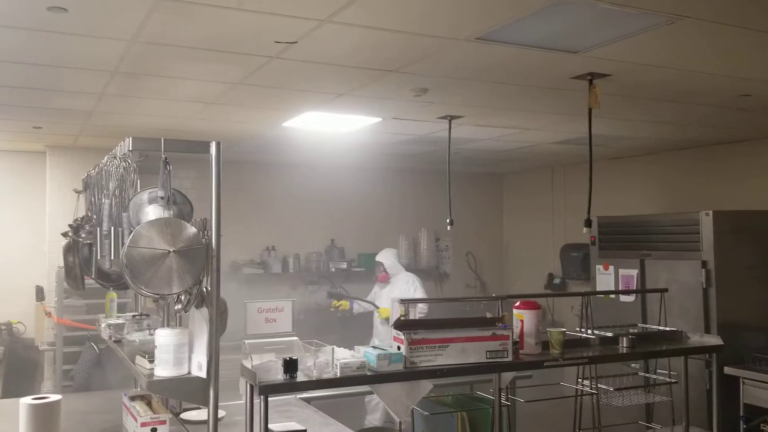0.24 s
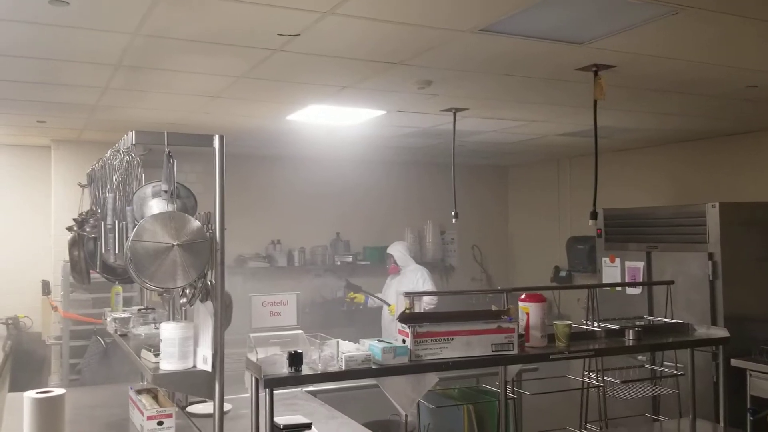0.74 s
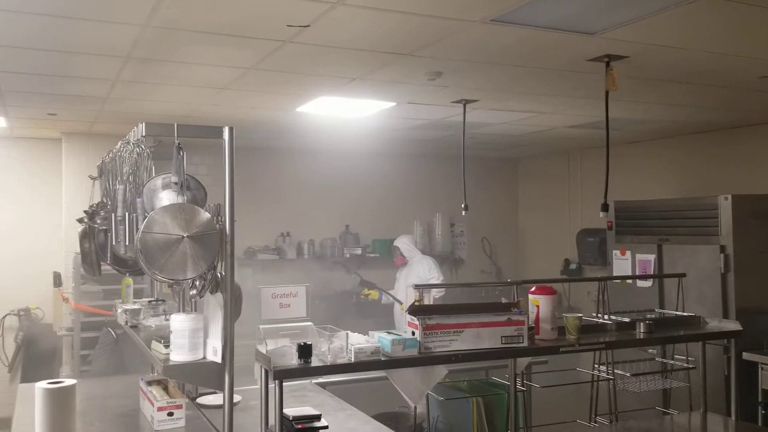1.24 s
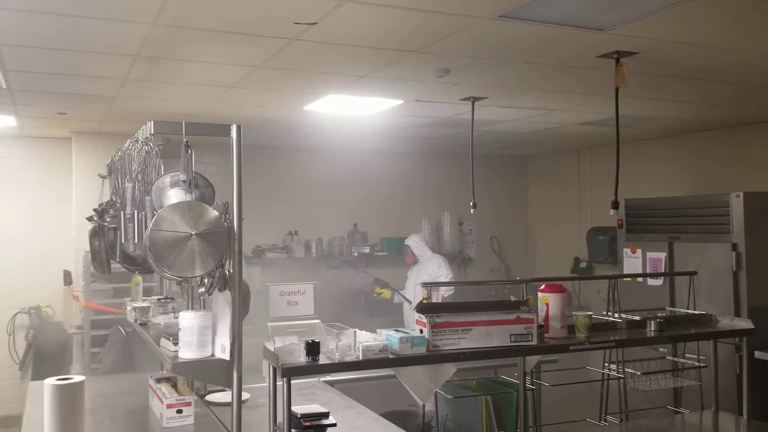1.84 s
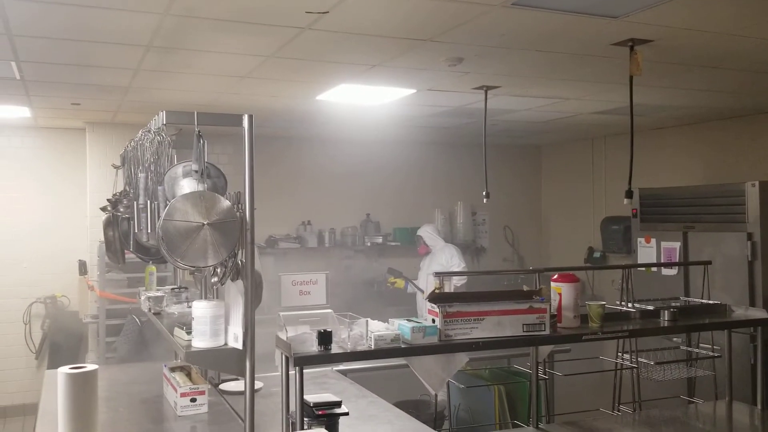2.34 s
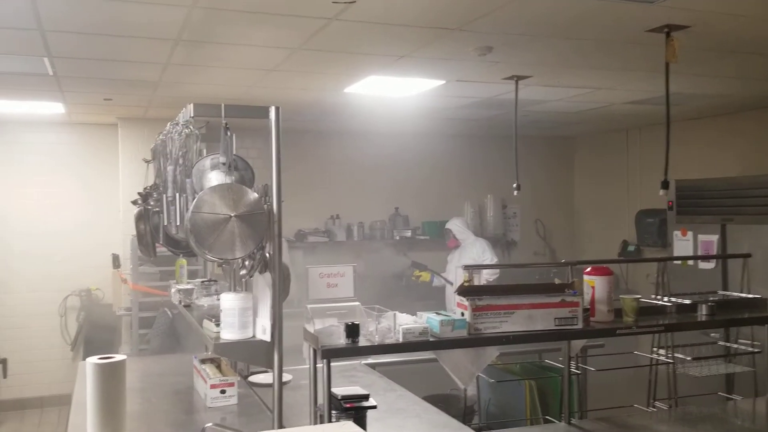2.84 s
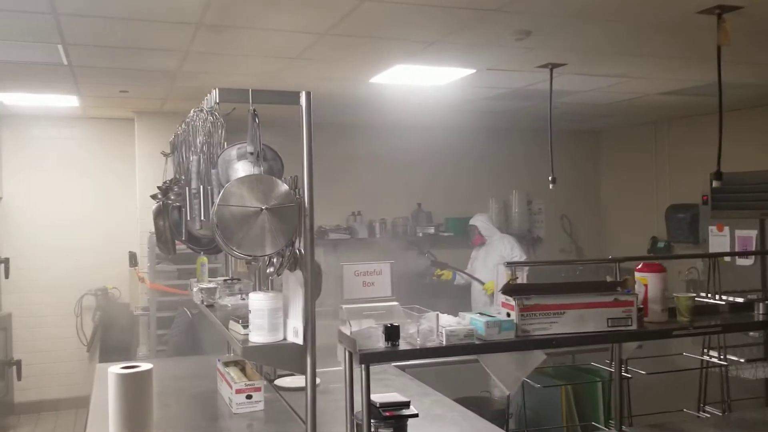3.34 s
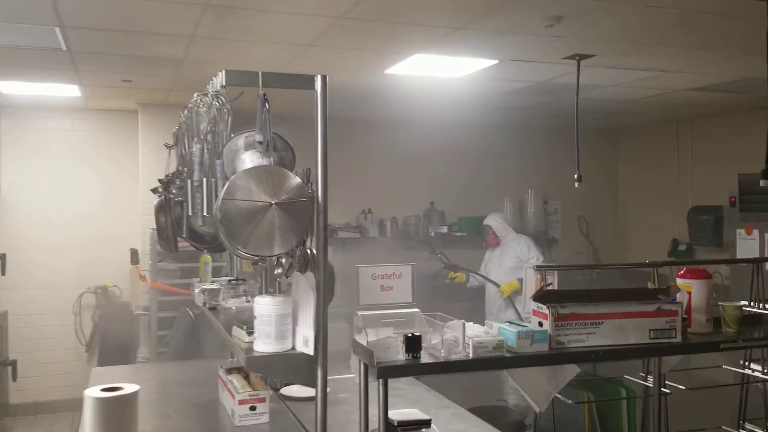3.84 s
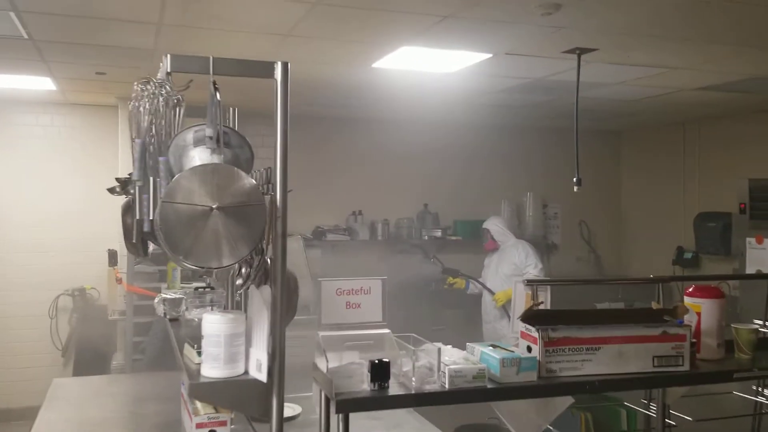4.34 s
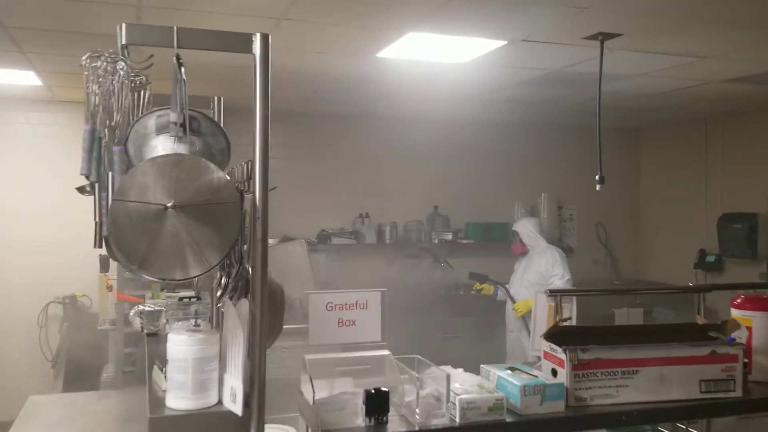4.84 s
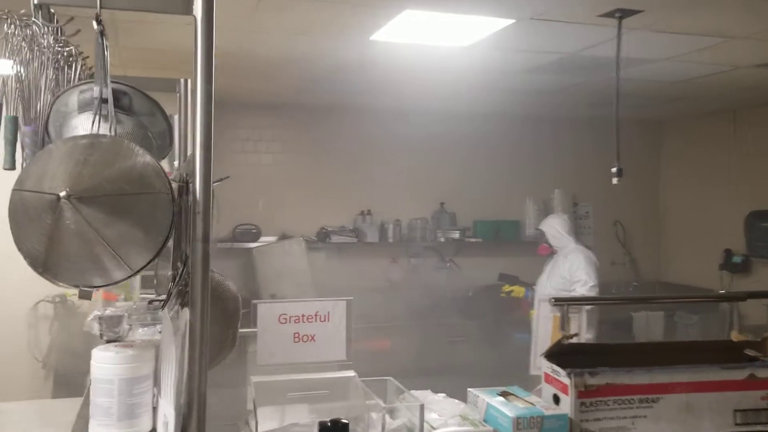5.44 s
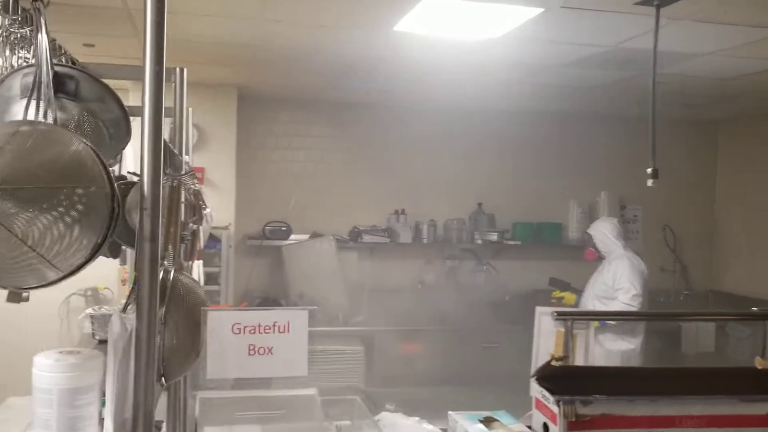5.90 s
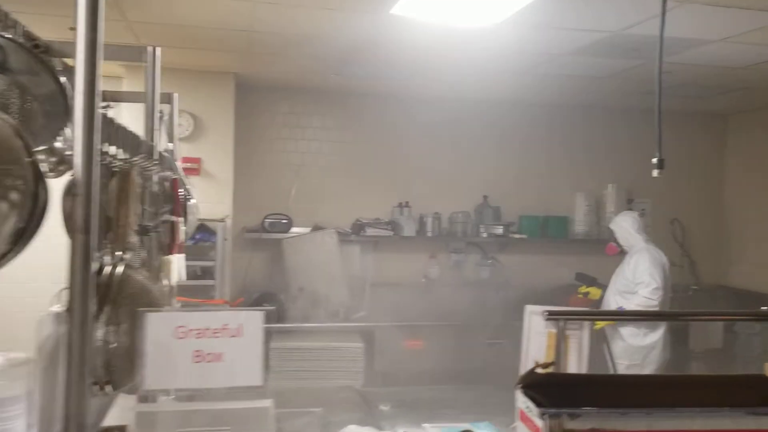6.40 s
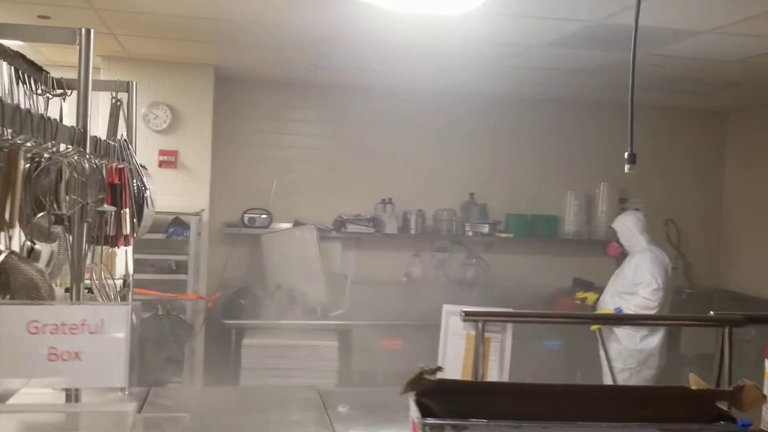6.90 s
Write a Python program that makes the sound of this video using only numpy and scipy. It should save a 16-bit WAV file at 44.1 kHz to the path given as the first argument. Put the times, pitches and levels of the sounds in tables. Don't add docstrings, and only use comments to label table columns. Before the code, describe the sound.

Continuous sharp sprayer hiss with low motor hum and dull room rumble inside a hard-walled kitchen. Early on, skin clicks and scuffs loudly across the left microphone, uncovering a brighter, left-heavy hiss while automatic gain pulls the background down. The spray grows slightly stronger as the handheld phone approaches, with one faint tick midway, a firmer one later and a sharp click near the end.

```python
import sys
import numpy as np
from scipy import signal
from scipy.fft import rfft, irfft
from scipy.io import wavfile
from scipy.ndimage import uniform_filter1d

SR = 44100
rng = np.random.default_rng(int(sys.argv[2]) if len(sys.argv) > 2 else 0)


def store_pcm(level_fs):
    pcm = np.round(np.clip(level_fs, -1, 1) * 32767).astype(np.int16)
    wavfile.write(sys.argv[1], SR, np.atleast_2d(pcm).T)


def rack_gain(trim_db):
    fader = np.asarray(trim_db, float)
    return 10 ** (fader / 20)


N = 315756

# f/Hz, density/(dB per Hz)
RUMBLE_SPECTRUM = [(25, -90.5), (45, -83.5), (62, -79), (85, -77.5), (110, -79), (150, -79), (190, -85.5),
                   (250, -88), (350, -89), (500, -91), (700, -94.2)]
# f/Hz, correlation/(0-1)
RUMBLE_LIKENESS = [(30, 0.6), (60, 0.93), (170, 0.91), (300, 0.92), (500, 0.36), (800, 0.43)]
# f/Hz, left-right/dB
RUMBLE_TILT = [(40, 1.5), (150, 2.5), (500, 3.1)]
# f/Hz, wander/Hz, left lead/rad, left-right/dB
MOTOR_TONES = [(119.8, .15, .1, 3), (138.6, .3, .25, 2), (156.3, .4, .0, 3), (279, .5, -.3, 1),
               (313.6, .2, .4, 5), (469.7, .15, -.8, 4)]
# t/s, level of each motor tone/dB (6 columns)
HUM_LEVELS = [(0, -56, -52.5, -60, -69.5, -71, -70), (0.35, -56.0, -54.0, -66, -74, -77, -70),
              (0.62, -58.5, -54, -72, -91, -68, -69.5), (1.05, -57, -58, -63, -72, -77, -72.5),
              (1.35, -54.5, -55.5, -63, -89.5, -76, -71.0), (1.65, -57.0, -55.5, -63, -77, -68, -73),
              (1.95, -59, -60.5, -67, -76.5, -69, -70), (2.25, -56.0, -59, -66.0, -76, -74, -82),
              (2.55, -56, -64.0, -72, -71, -79, -77), (2.85, -62, -54, -61, -75, -67, -75.0),
              (3.15, -57, -52.5, -64.0, -74, -67.5, -71), (3.45, -59.5, -66, -69.0, -70, -76, -69.5),
              (3.75, -67, -69, -65, -69, -88.0, -68.0), (4.05, -64, -75, -61, -72.0, -84.0, -64.5),
              (4.35, -72, -60, -66, -71, -79, -65.5), (4.65, -57, -69.5, -59, -69, -71, -65.5),
              (4.95, -60, -64, -73, -83, -83.0, -64.5), (5.25, -56, -60, -73, -71, -69, -65),
              (5.55, -58.0, -70, -58, -68.5, -66, -71.5), (5.85, -57.5, -61, -64.0, -78, -63, -75),
              (6.15, -56, -68, -59, -67, -67.5, -79), (6.449, -57, -60, -66, -72.5, -65, -75),
              (6.75, -57, -57, -76, -65.5, -69, -91), (7.05, -57, -62, -72, -70.5, -80, -78)]
# f/Hz, level/dB
OVERTONES = [(59.5, -69.5), (297.4, -76), (359.3, -80.5)]
# t/s, covered share/(0-1), scrape level/dB, scrape brightness/(0-1)
FINGER = [
    (.735, 0.92, -55, .6),
    (.76, 1., -30, .5),
    (.775, .97, -22.5, 0.3),
    (.795, 0.77, -21.5, 1.),
    (.815, 0.33, -23.5, 0.22),
    (.835, 0.2, -27.5, .9),
    (.86, .28, -31.5, 0.6),
    (.885, 0.5, -34.5, 0.8),
    (.9, 0.1, -36, 0.6),
    (.95, 0.07, -51, .5),
]
# f/Hz, level/dB
DRAG_COLOUR = [(80, -9), (160, -5), (600, -2), (1200, -1), (1700, -10), (2500, -26)]
# f/Hz, level/dB
SQUEAK_COLOUR = [(1200, -24), (2000, -6.5), (2700, -2), (3400, -3.5), (3900, -10), (9000, -19)]
# t/s, peak/dB, f/Hz, decay/cycles, phase/turns
GRIP_TICKS = [
    (.76077, -11, 2000, .6, .35),
    (2.9813, -28, 1650, .6, .9),
    (4.8999, -19, 2100, .6, .9),
    (5.9516, -15, 3200, .48, .77),
    (5.9519, -29, 3850, 2., .4),
    (5.9517, -29, 420, .3, .45),
    (5.9585, -40, 1500, .8, .0),
]
# f/Hz, density/(dB per Hz)
JET_LEFT = [(500, -96.5), (900, -94), (1500, -93), (2300, -87), (4000, -83.5), (6000, -78), (7900, -74),
            (9000, -76), (10500, -70), (12000, -63.5), (13200, -56), (14000, -55), (15000, -52.5),
            (15700, -54)]
# f/Hz, density/(dB per Hz)
JET_RIGHT = [(500, -99), (900, -99.7), (1600, -94.5), (3500, -91), (5300, -81), (6200, -84), (6900, -88),
             (7800, -81), (9400, -82), (11000, -74), (12500, -67.5), (13900, -69), (14800, -74),
             (15600, -76)]
# t/s, left top band/dB, left body/dB, right/dB
NOZZLE_PATH = [(0.0, -2, -0.5, -2.3), (0.14, 0.5, -0.4, -2.2), (0.28, 0.5, -0.8, -2.2),
               (0.42, -0.5, -0.8, -2), (0.56, -0.2, -0.7, -3), (1.05, -3.5, -1.4, -3),
               (1.19, -2.3, -1.2, -2.5), (1.33, -2.2, -0.6, -2), (1.47, -1.8, -1.5, -4),
               (1.61, -3.5, -1.1, -3), (1.75, -1.7, -1.5, -2), (1.89, -1.5, -1.77, -2.5),
               (2.03, -1.7, -0.8, -2), (2.17, -0.42, -1.5, -3), (2.31, -0.2, -1.2, -2.5),
               (2.45, -1, -0.7, -2.5), (2.59, -2.1, -1.2, -3), (2.73, -2, -1, -2.5),
               (2.87, -2.62, -0.6, -3.5), (3.01, -0.5, 0, -2.5), (3.15, -0.5, -0.66, -2.5),
               (3.29, -1.23, -0.1, -1.5), (3.43, -0.2, 0, -2), (3.57, -0.23, 1, -0.48),
               (3.71, 0.7, 0.6, -2.5), (3.85, 1, 1.1, -1), (3.99, 0.6, 0.9, -1.5), (4.13, 2.3, 0.6, -0.11),
               (4.27, 0.7, 1, -1.5), (4.41, 1.7, 1.3, -0.5), (4.55, 1.7, 1.5, 0), (4.69, 1.5, 1.5, -0.5),
               (4.83, 1, 2, -1), (4.97, 0.7, 2, -0.5), (5.11, 3.2, 2.5, -0.3), (5.25, 2, 2.5, 0),
               (5.39, 2, 2.6, -0.5), (5.53, 2.3, 2.5, 0), (5.67, 2.3, 2.7, 0.5), (5.81, 3.7, 3.3, 0),
               (5.95, 2.8, 3, -1), (6.09, 4, 3.5, 0.5), (6.23, 2.8, 2.7, -1), (6.37, 2.2, 2.2, -0.5),
               (6.51, 2.5, 3.1, -0.5), (6.65, 1.8, 2.5, -1.5), (6.79, 2.2, 2.5, 0), (6.93, 3, 2.2, 0),
               (7.07, 1.3, 2.5, 0.5), (7.16, 0.5, 0.5, -1)]
# f/Hz, loss/dB
FINGER_LOSS = [(1000, 1), (3000, -0.5), (8000, 2.5), (11500, 6), (12800, 10.5), (14200, 23), (15500, 25),
               (17000, 21)]
# t/s, gain/dB
AUTO_GAIN = [
    (0, 10),
    (.755, 10.5),
    (.765, 8.5),
    (.8, 9),
    (.85, 6.5),
    (.92, 3.5),
    (1.02, 3),
    (1.25, 0.5),
    (7.2, -1),
]
# f/Hz, threshold/dB
GATE_LEFT = [(600, -12), (1200, -4.5), (4000, -4), (7000, -5.5), (12000, -8)]
# f/Hz, threshold/dB
GATE_RIGHT = [(600, -12), (1500, -4.5), (3200, -2.6), (6800, -2.2), (9000, -3), (11000, -6), (13500, -6),
              (15000, -3.5)]


def unit_power(x):
    return x / np.sqrt(np.mean(x ** 2) + 1e-20)


def read_spectrum(points, f_hz):
    table_hz, value = np.transpose(points)
    return np.interp(np.log(np.maximum(f_hz, 1)), np.log(table_hz), value)


def read_curves(rows, t_s):
    table_s, *columns = np.transpose(rows)
    return [np.interp(t_s, table_s, column) for column in columns]


def white_stft(size):
    noise = rng.standard_normal((2, N)) * np.sqrt(SR / 2)
    return signal.stft(noise, SR, nperseg=size, noverlap=size * 3 // 4)


def to_samples(z, size):
    return signal.istft(z, SR, nperseg=size, noverlap=size * 3 // 4)[1][..., :N]


def random_field(count, along_time, along_hz):
    bumps = rng.standard_normal((2, count, 513))
    bumps = uniform_filter1d(bumps, size=along_time, axis=1)
    bumps = uniform_filter1d(bumps, size=along_hz, axis=2)
    return unit_power(bumps).transpose(0, 2, 1)


def add(mix, start_s, part):
    start = round(start_s * SR)
    mix[start:start + len(part)] += part


def rumble():
    f_hz, _, (shared, other) = white_stft(size=4096)
    same = np.clip(read_spectrum(RUMBLE_LIKENESS, f_hz), 0, 1)[:, None]
    high_cut = 1 / np.sqrt(1 + (f_hz / 650) ** 8)
    level = (rack_gain(read_spectrum(RUMBLE_SPECTRUM, f_hz)) * high_cut)[:, None]
    tilt = rack_gain(-read_spectrum(RUMBLE_TILT, f_hz))[:, None]
    right = (same * shared + np.sqrt(1 - same ** 2) * other) * tilt
    return to_samples(level * np.array([shared, right]), size=4096)


def hum():
    t_s = np.arange(N) / SR
    out = np.zeros((2, N))
    for (f_hz, wander_hz, lead_rad, tilt_db), level_db in zip(MOTOR_TONES, read_curves(HUM_LEVELS, t_s)):
        knots_s = np.linspace(0, t_s[-1], num=30)
        drift = unit_power(np.interp(t_s, knots_s, rng.standard_normal(size=30)))
        angle = 2 * np.pi * (np.cumsum(f_hz + wander_hz * drift) / SR + rng.random())
        ports = np.array([np.sin(angle), rack_gain(-tilt_db) * np.sin(angle - lead_rad)])
        out += np.sqrt(2) * rack_gain(level_db) * ports
    for f_hz, level_db in OVERTONES:
        tone = np.sin(2 * np.pi * (f_hz * t_s + rng.random()))
        out += np.sqrt(2) * rack_gain(level_db) * tone * rack_gain(np.array([[0], [-2.5]]))
    return out


def scrape(slips_per_s=6000, spread_db=0.5):
    t_s = np.arange(FINGER[0][0], FINGER[-1][0], 1 / SR)
    _, level_db, bright = read_curves(FINGER, t_s)
    chance, size, sign = rng.random((12000, 3))[:len(t_s)].T
    size_db = spread_db * np.minimum(-np.log(1 - size), 2.5)
    slips = (chance < slips_per_s / SR) * rack_gain(size_db) * np.sign(sign - 0.5)
    f_hz = np.fft.rfftfreq(len(t_s), 1 / SR)
    spectrum = rfft(slips)
    drag = irfft(spectrum * rack_gain(read_spectrum(DRAG_COLOUR, f_hz)), len(t_s))
    squeak = irfft(spectrum * rack_gain(read_spectrum(SQUEAK_COLOUR, f_hz)), len(t_s))
    pops = drag + np.clip(bright, 0, 1) * squeak
    local_rms = np.sqrt(uniform_filter1d(pops ** 2, size=900) + 1e-12)
    return pops / local_rms * rack_gain(level_db)


def tick(peak_db, f_hz, decay_cycles, phase_turns):
    cycles = np.arange(400) * f_hz / SR
    envelope = cycles ** 2 * np.exp(-cycles / (decay_cycles / 2))
    snap = envelope * np.sin(2 * np.pi * (cycles + phase_turns))
    return rack_gain(peak_db) * snap / abs(snap).max()


def grip():
    left = np.zeros(N)
    add(left, FINGER[0][0], scrape() * rack_gain(-8))
    for start_s, *shape in GRIP_TICKS:
        add(left, start_s, tick(*shape))
    return left * rack_gain(np.array([[0], [-48]]))


def jet(patch_db=0.69, ripple_db=2.1, gust_db=0.29):
    f_hz, t_s, z = white_stft(size=1024)
    column_hz = f_hz[:, None]
    top_db, body_db, right_db = read_curves(NOZZLE_PATH, t_s)
    covered = read_curves(FINGER, t_s)[0]
    top = np.clip((column_hz - 10000) / 3000, 0, 1)
    loss_db = covered ** 0.6 * read_spectrum(FINGER_LOSS, column_hz - 3000 * (1 - covered))
    left = read_spectrum(JET_LEFT, f_hz)[:, None] + top * top_db + (1 - top) * body_db - loss_db
    right = read_spectrum(JET_RIGHT, f_hz)[:, None] + right_db
    patches = random_field(len(t_s), 10, 24)
    ripple = random_field(len(t_s), 60, 2)
    gusts = unit_power(uniform_filter1d(rng.standard_normal((2, 1, len(t_s))), size=7))
    flutter_db = patch_db * patches + ripple_db * ripple + gust_db * gusts
    low_cut = 1 / np.sqrt(1 + (520 / np.maximum(column_hz, 1)) ** 6)
    return to_samples(z * rack_gain(np.array([left, right]) + flutter_db) * low_cut, size=1024)


def scene():
    return rumble() + hum() + grip() + jet()


def gate(x):
    f_hz, _, z = signal.stft(x, SR, nperseg=1024, noverlap=768)
    band = uniform_filter1d(uniform_filter1d(abs(z) ** 2, size=4, axis=1), size=5, axis=2)
    around = uniform_filter1d(np.log(band + 1e-20), size=31, axis=1)
    around = uniform_filter1d(around, size=9, axis=2)
    threshold_db = [read_spectrum(GATE_LEFT, f_hz), read_spectrum(GATE_RIGHT, f_hz)]
    threshold = rack_gain(threshold_db)[:, :, None] ** 2
    shut = uniform_filter1d(1.0 * (band < np.exp(around) * threshold), size=3, axis=2)
    return to_samples(z * rack_gain(-25 * shut), size=1024)


def band_limit(x):
    return signal.sosfilt(signal.butter(12, 15800, fs=SR, output="sos"), x)


def record(dry):
    gain_db, = read_curves(AUTO_GAIN, np.arange(N) / SR)
    gated = gate(dry * rack_gain(gain_db))
    low_pass = signal.firwin(numtaps=1023, cutoff=15760, window=("kaiser", 9), fs=SR)
    limited = signal.oaconvolve(gated, low_pass[None], "same")
    return band_limit(limited)


dry = scene()
out = record(dry)
store_pcm(out)
```